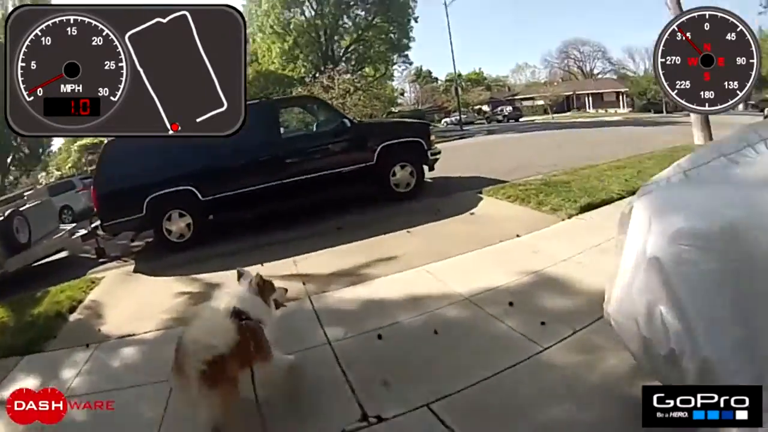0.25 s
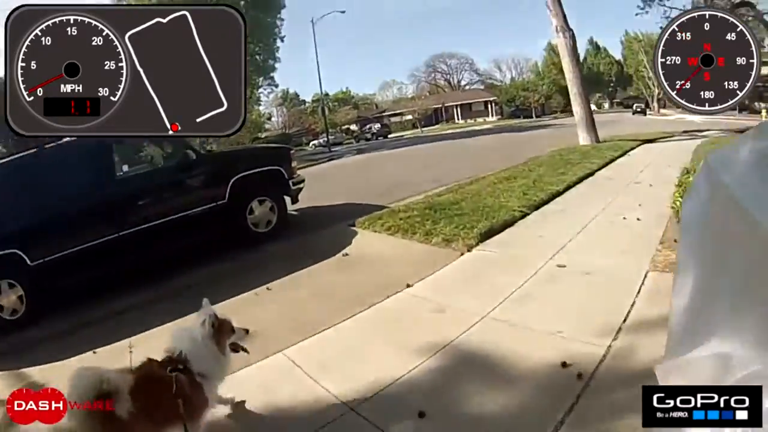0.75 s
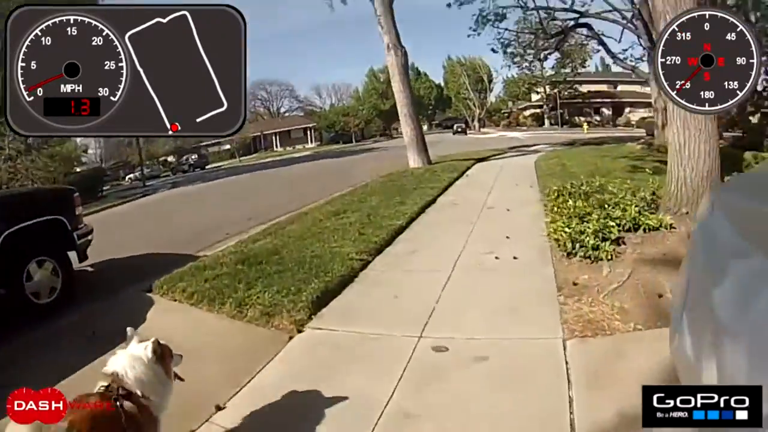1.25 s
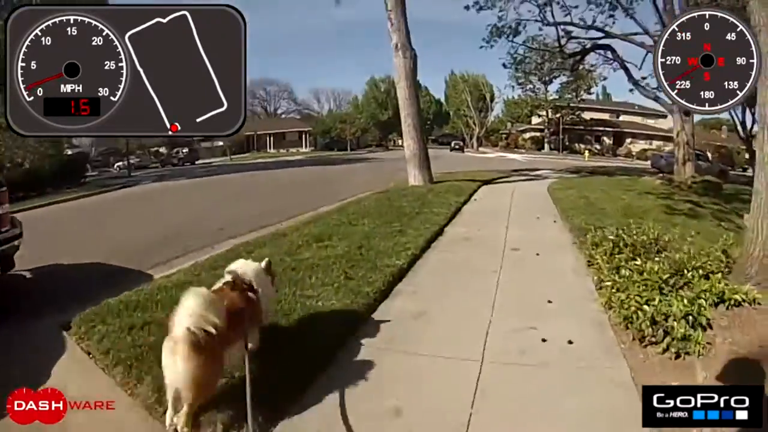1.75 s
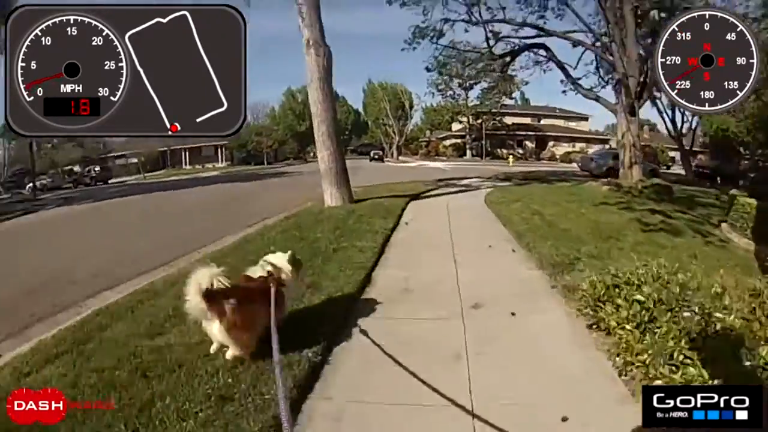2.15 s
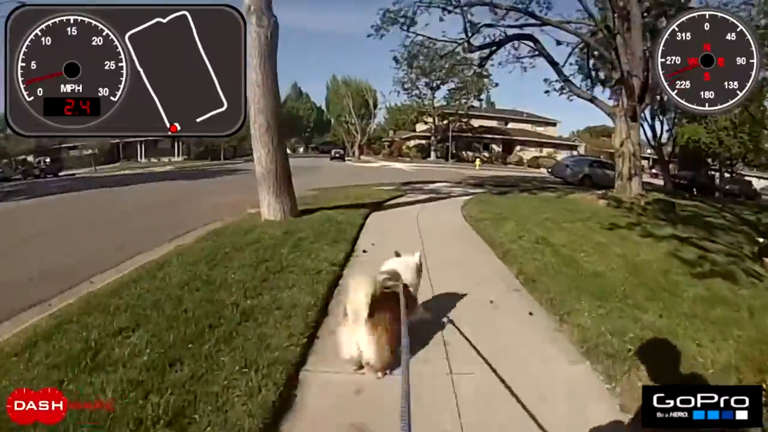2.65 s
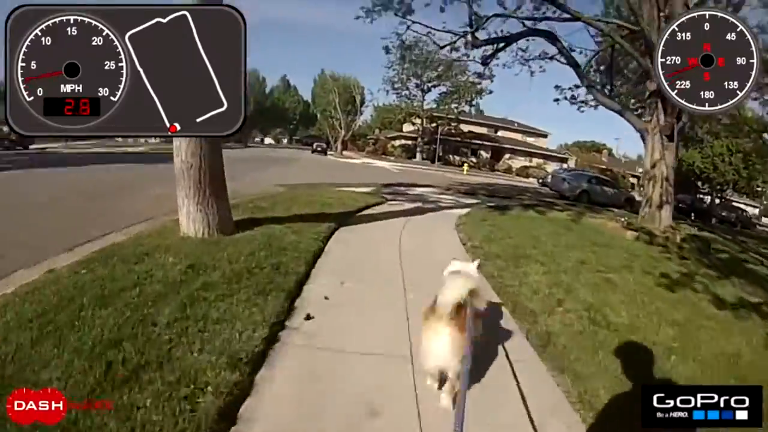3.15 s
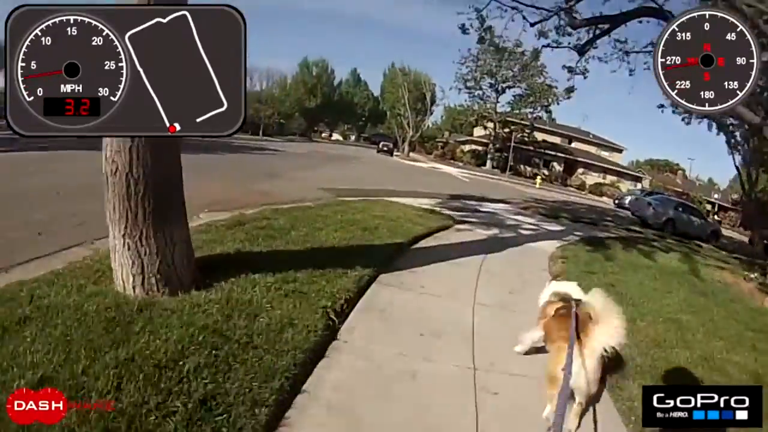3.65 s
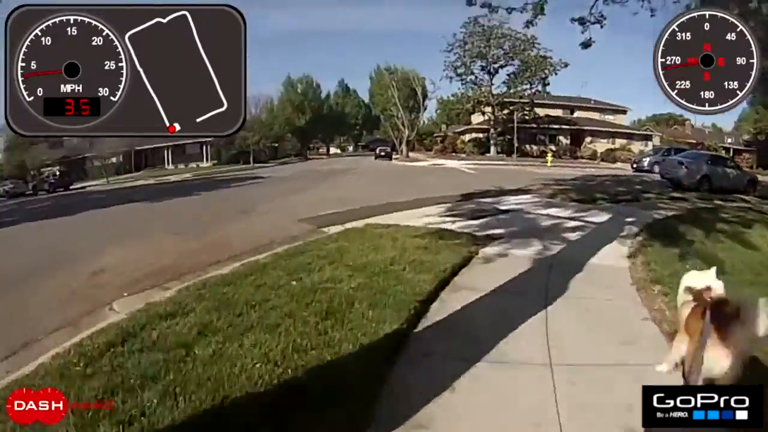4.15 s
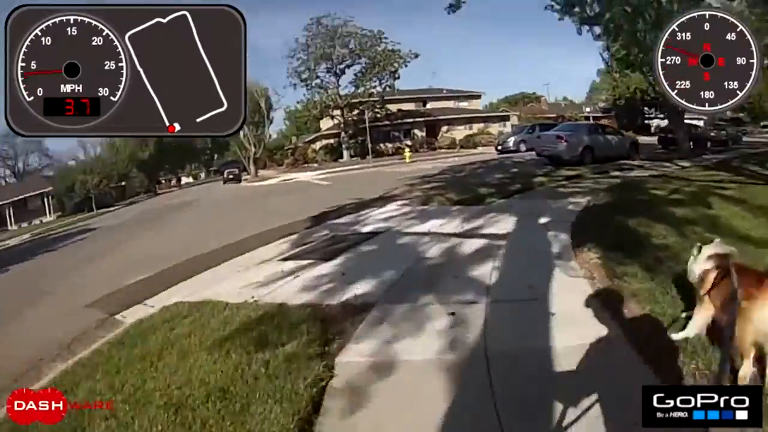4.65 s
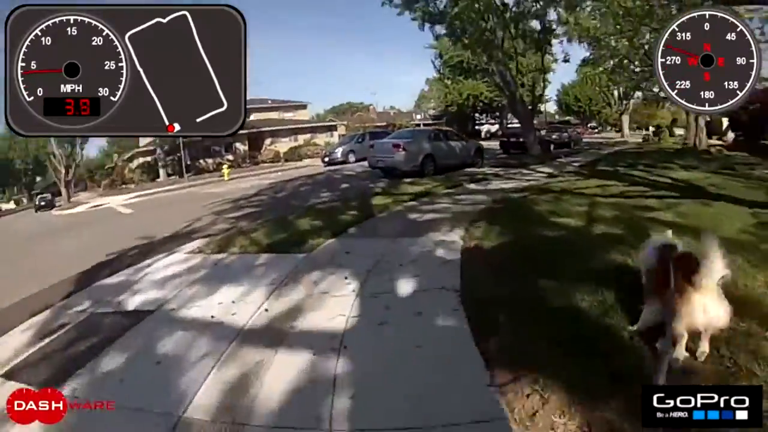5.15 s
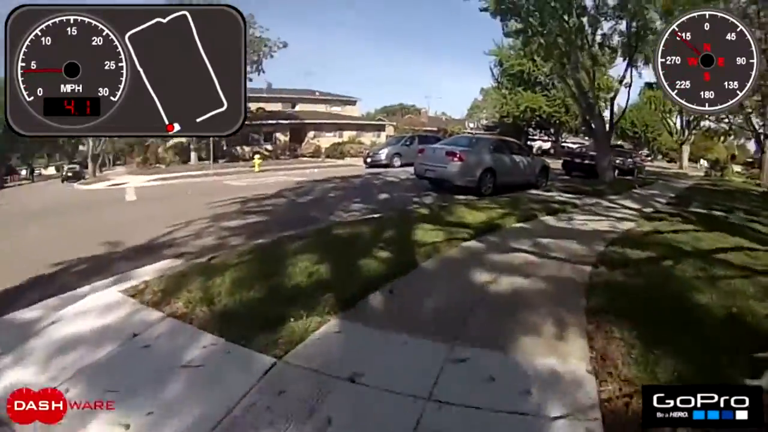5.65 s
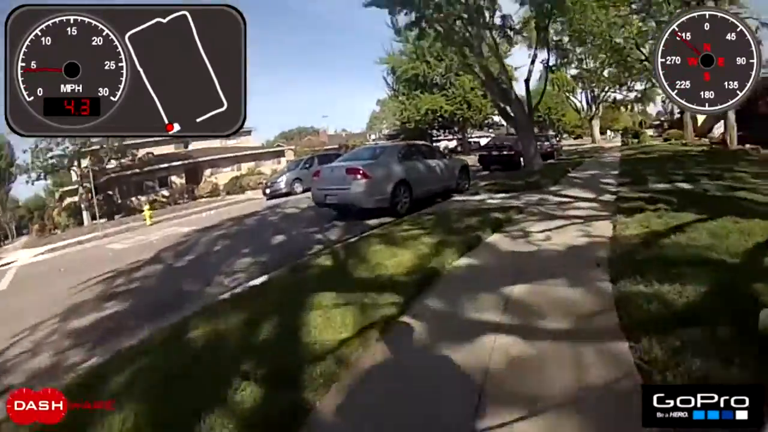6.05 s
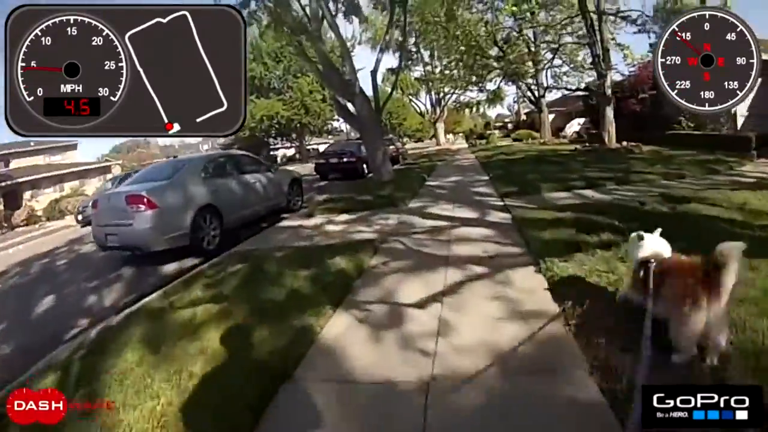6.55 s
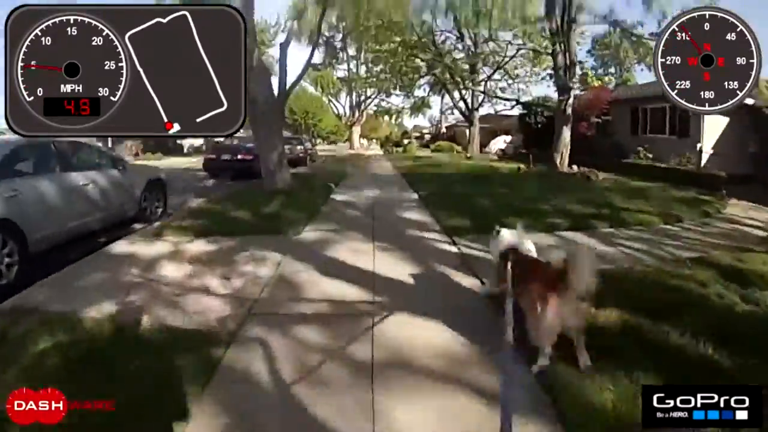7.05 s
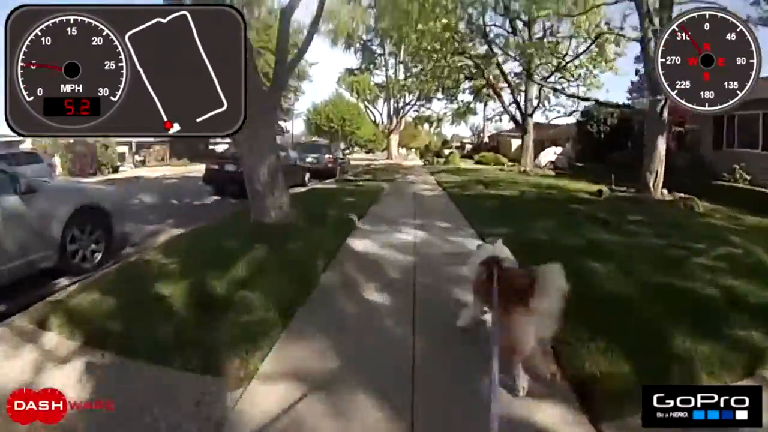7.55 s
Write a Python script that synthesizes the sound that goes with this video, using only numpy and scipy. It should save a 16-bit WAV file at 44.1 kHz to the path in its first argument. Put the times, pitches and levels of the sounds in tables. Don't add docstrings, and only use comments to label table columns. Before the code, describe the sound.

Small hard wheels rumble over a concrete sidewalk, thumping at slab joints, with dull plastic knocks, dry ticks and grit snaps close to the microphone.

```python
import sys
import numpy as np
from scipy import signal
from scipy.fft import rfft, irfft, next_fast_len
from scipy.io import wavfile
from scipy.ndimage import uniform_filter1d, map_coordinates

SR = 44100
rng = np.random.default_rng(int(sys.argv[2]) if len(sys.argv) > 2 else 0)


def undo_db(level):
    steps = np.asarray(level, float) / 20
    return 10 ** steps


def waveform_to_disk(signal):
    frames = np.transpose(np.atleast_2d(signal))
    scaled = np.clip(frames, -1, 1) * 32767
    samples = np.round(scaled).astype(np.int16)
    wavfile.write(sys.argv[1], SR, samples)


N = 343980

# centre_hz, width_hz, level_db
MOUNT_MODES = [(65.1, 20.9, 3.5), (82.6, 35.2, -0.5)]
# centre_hz, width_hz, level_db
EDGE_MODES = [(527, 200, 11), (900, 380, 2.5)]
# centre_hz, width_hz, level_db
HOUSING_MODES = [(1150, 300, 7), (1330, 311, 8), (1500, 500, -2.5), (2167, 130, -10.5), (2210, 480, -11.5)]
# centre_hz, width_hz, level_db
SHELL_MODES = [(1670, 370, 7), (2480, 400, -3)]
# start_s, tick_peak_db, thump_db, knock_db, sharp_edge_db
SLAB_JOINTS = [(0.8377, -29.5, -6.5, -52, -25.5), (1.0494, -25.5, -5, -34, -11.5),
               (1.454, -28.5, -8, -16.5, -17.5), (1.6799, -29.5, -7.5, -12.5, -29),
               (1.9102, -36.5, -21.5, -16, -26), (1.9934, -33.5, -10, -19, -24.5),
               (2.0648, -32.5, -13, -29, -28), (3.1837, -32, -10.5, -39.5, -23.5),
               (4.171, -26, -9.5, -28, -29.5), (4.358, -38, -11.5, -30, -26),
               (4.8778, -32, -10, -44.5, -32), (5.1131, -31, -9.5, -35, -24.5),
               (5.2739, -29, -9.5, -25, -30), (5.451, -33.5, -11, -27.5, -21),
               (5.5015, -21.5, -6, -26, -23), (5.675, -37, -9, -25.5, -18.5),
               (5.8233, -17.5, -11, -21.5, -19), (5.9859, -26, -8, -16.5, -12.5),
               (6.9561, -29, -10.5, -22.5, -16.5), (7.0978, -32.5, -14, -25.5, -20),
               (7.1254, -23.5, -14.5, -21.5, -19), (7.3391, -36, -10.5, -43, -36),
               (7.5312, -27, -14, -29, -23)]
# start_s, tick_peak_db, thump_db, knock_db, sharp_edge_db
FINE_CRACKS = [(0.5189, -47, -12, -27, -30.5), (1.0627, -34, -26, -41, -33), (1.615, -56, -22, -25, -36),
               (1.6279, -58, -19.5, -24.5, -38), (2.303, -39, -10.5, -31, -38.5),
               (2.376, -44.5, -20, -37.5, -53.5), (2.6536, -34, -10.5, -31.5, -41),
               (2.9166, -36, -15, -42, -38.5), (3.1974, -36, -28.5, -57, -33), (4.1831, -35, -22, -53, -27),
               (4.403, -50.5, -19.5, -42, -42), (4.636, -33, -7.5, -42.5, -30.5),
               (4.6499, -40, -18, -51, -34), (4.8186, -48.5, -14.5, -28.5, -41),
               (6.0244, -43.5, -18.5, -37, -29.5), (6.1471, -40, -16, -49.5, -35),
               (6.193, -44, -19, -29.5, -27.5), (6.794, -34, -29, -37, -19), (6.9676, -39, -20, -48, -25),
               (7.136, -35.5, -21, -45, -26.5)]
# start_s, thump_peak_db, sharp_edge_db
STONES = [(0.22, -14, -44), (0.287, -9.5, -45), (0.456, -18, -30.5), (0.673, -7.5, -42), (1.19, -15, -41),
          (1.233, -13.5, -40), (2.608, -5, -39), (2.869, -1.5, -46), (3.083, -17, -28.5), (3.119, -6, -38),
          (3.39, -6, -38), (3.454, -10, -36), (3.559, -12, -35), (3.648, -7, -55), (3.695, -8.5, -39),
          (3.937, -9, -40), (4.091, -6, -41), (4.28, -9, -25.5), (4.579, -5.5, -50), (4.802, -6, -32),
          (4.968, -8, -36), (5.042, -7.5, -41), (5.789, -6.5, -37), (6.293, -3.5, -22.5),
          (6.774, -5.5, -26), (6.901, -8.5, -27), (7.536, -9.5, -26), (7.631, -16, -29),
          (7.682, -13.5, -30), (7.695, -14, -26.5)]
# start_s, peak_db, upper_modes_db
LONE_KNOCKS = [(0.218, -21, -29.5), (0.292, -27, -43), (0.339, -28, -28.5), (0.6781, -30, -52),
               (1.1891, -26.5, -53), (1.2056, -19.5, -38), (1.2288, -22.5, -46.5), (1.954, -15.5, -22.5),
               (1.9985, -12.5, -21.5), (2.474, -24.5, -43.5), (2.516, -28.5, -37), (2.617, -24, -29),
               (3.076, -21, -43), (3.091, -12.5, -41), (3.159, -36, -49), (3.5448, -25, -33),
               (3.557, -16.5, -33), (4.1367, -28, -51), (4.2843, -27.5, -55), (4.5981, -23.5, -51),
               (5.66, -24, -52), (6.2747, -21, -54), (6.3296, -23, -35), (6.429, -25, -49),
               (6.487, -44, -31), (6.794, -26, -42), (7.0107, -34, -37.5), (7.175, -25, -33),
               (7.2529, -23, -34), (7.6227, -44, -40)]
# start_s, peak_db, pitch_hz
DECK_THUDS = [(0.1489, -26.5, 288), (0.1803, -23.5, 280), (0.2217, -18, 280), (0.6345, -17.5, 273),
              (1.3848, -15, 267), (1.872, -18, 258), (1.915, -10, 300), (1.9553, -13, 288),
              (1.9938, -5, 256), (2.2278, -19, 270), (2.4768, -32, 270), (2.6334, -17.5, 270),
              (2.7974, -31, 300), (3.0884, -16, 280), (3.133, -18, 260), (3.6038, -16, 250),
              (3.7043, -18, 244), (3.9063, -27, 260), (4.014, -28, 260), (4.0772, -19.5, 250),
              (4.1372, -17.5, 250), (4.1826, -22, 264), (4.4873, -20, 260), (5.0231, -25, 259),
              (5.5983, -26, 248), (5.7177, -23, 270), (5.9234, -15.5, 250), (6.0397, -16, 280),
              (6.3309, -20, 290), (6.5758, -19.5, 300), (6.6679, -23, 258), (6.736, -30, 260),
              (6.868, -21.5, 290), (7.1218, -12.5, 250), (7.6053, -19.5, 277), (7.6975, -15, 250)]
SHELL_FROM_HZ = 3000


def unit(x):
    return x / np.sqrt(np.mean(x ** 2) + 1e-20)


def steadied(x, span):
    power = np.abs(uniform_filter1d(x ** 2, int(span * SR)))
    return unit(x / np.sqrt(power + 0.41 * np.mean(x ** 2)))


def wobble(rate):
    knots = rng.standard_normal(int(N * rate / SR) + 4)
    return map_coordinates(knots, [np.arange(N) * rate / SR])


def filtered(x, response):
    m = next_fast_len(N + SR // 2)
    return irfft(rfft(x, m) * response(np.fft.rfftfreq(m, 1 / SR)), m)[:N]


def body(modes, low_hz, top_hz, order=2):
    def response(f):
        modal = 0
        for k, (centre, width, db) in enumerate(modes):
            resonance = 1j * f * width / (centre ** 2 - f * f + 1j * f * width)
            modal = modal + (-1) ** k * undo_db(db) * resonance
        stiffness = (1j * f / (low_hz + 1j * f)) ** 2
        damping = (1 + 1j * f / top_hz - (f / top_hz) ** 2) ** order
        whole = modal * stiffness / damping
        return whole / np.abs(irfft(whole)).max()
    return response


def bright(f):
    # frequency_hz, spectrum_db
    colour = [(2200, -50), (2800, 2), (3500, -0.5), (5000, -1), (7000, -8.5), (10000, -16), (11200, -16.5),
              (15500, -36)]
    hz, db = np.transpose(colour)
    return undo_db(np.interp(np.log(f + 1), np.log(hz), db))


def grit(rate, scatter_db):
    spread = np.minimum(rng.exponential(size=N), 4.5)
    size = undo_db(scatter_db * spread) * rng.standard_normal(N)
    return size * (rng.random(N) < rate / SR)


def blows(times, level_db):
    x = np.zeros(N)
    way = np.where(rng.random(len(times)) < 0.06, -1, 1)
    np.add.at(x, np.clip((times * SR).astype(int), 0, N - 1), way * undo_db(level_db))
    return x


def bursts(times, level_db, lengths):
    x, t = np.zeros(N + SR), np.arange(SR // 20) / SR - 0.008
    sub_hits = rng.standard_normal((len(times), len(t) // 63)).repeat(63, axis=1)
    chatter = rng.standard_normal((len(times), len(t))) * undo_db(5.2 * sub_hits)
    for s, db, length, row in zip(times, level_db, lengths, chatter):
        hit = row * np.where(t > 0.001, undo_db(-20 * t / length), undo_db(-9 + 20 * t / 0.0055))
        hit *= np.sqrt(length * SR) / np.linalg.norm(hit)
        x[max(int((s + t[0]) * SR), 0):][:len(t)] += undo_db(db) * hit
    return x[:N]


def notes(rows, rise, gain_db):
    x, t = np.zeros(N + SR), np.arange(SR // 20) / SR
    swell = t / rise * np.exp(1 - t / rise)
    for s, db, hz in rows:
        x[int((s - rise) * SR):][:len(t)] += undo_db(db + gain_db) * swell * np.sin(2 * np.pi * hz * t)
    return x[:N]


def tick_pitches(count):
    return 3800 * np.exp(0.13 * rng.standard_normal(count))


def joint_parts():
    s, tick_db, thump_db, knock_db, edge_db = np.transpose(SLAB_JOINTS + FINE_CRACKS)
    knock_db = knock_db + 4.5
    upper_db = -5 + 0.57 * tick_db + 0.43 * knock_db
    thumps = (s - 0.00524, thump_db + 7.5, edge_db + 7.5)
    return thumps, (s - 0.001, knock_db, upper_db), (s, tick_db)


def open_air():
    return undo_db(-84.5 + 2 * wobble(8)) * unit(filtered(rng.standard_normal(N), bright))


def tags():
    # start_s, length_s, level_db
    jingles = [(0.336, 0.011, -52), (0.455, 0.013, -44.5), (0.679, 0.025, -61), (1.675, 0.026, -51.5),
               (3.463, .04, -60), (3.545, 0.025, -52), (5.882, .01, -64), (6.335, 0.012, -61.5),
               (6.364, 0.011, -53), (7.095, 0.033, -55.5), (7.126, 0.059, -61), (7.164, 0.1, -60)]
    # centre_hz, width_hz, level_db
    metal_modes = [(4000, 180, 9), (5000, 230, 1), (6100, 250, -2.5), (7540, 250, -4), (8780, 200, -6),
                   (11400, 290, -5), (11800, 400, -9.5)]
    shake = np.zeros(N)
    for s, length, db in jingles:
        shake[int(s * SR):int((s + length) * SR)] = undo_db(db)
    contacts = grit(rate=1200, scatter_db=4) * undo_db(4 * wobble(70))
    ringing = unit(filtered(contacts, body(metal_modes, low_hz=2530, top_hz=13000)))
    return uniform_filter1d(shake, int(0.006 * SR)) * ringing


def swing_under_way():
    # start_db, pitch_hz, t60_s
    first_swing = (-1.5, 72, 0.1)
    t, (start_db, hz, t60) = np.arange(N) / SR, first_swing
    return undo_db(start_db - 60 * t / t60) * np.cos(2 * np.pi * hz * t + 0.85)


def specks():
    # start_s, peak_db
    small_specks = [(0.2348, -45.5), (0.3487, -51), (0.4668, -48.5), (0.8473, -45), (1.2505, -49),
                    (1.63, -48), (1.6359, -47.5), (1.6848, -39), (1.696, -45), (1.919, -44), (1.956, -41),
                    (1.9595, -48.0), (2.0036, -38), (2.07, -43.5), (2.0947, -45), (2.306, -41),
                    (2.4903, -50), (2.552, -48.5), (2.5591, -45), (2.6594, -48), (2.6675, -45.5),
                    (2.8544, -48), (3.47, -51), (3.552, -49), (3.5598, -43), (3.5673, -48.0), (3.7002, -51),
                    (3.7123, -50), (3.723, -47), (3.7959, -49.5), (3.807, -45.5), (3.8298, -46),
                    (3.8375, -51.5),
                    (4.5835, -52), (4.589, -46.5), (5.2885, -46.5), (5.6845, -47), (5.8011, -44.5),
                    (5.8087, -48), (5.9945, -44.5), (6.0412, -50), (6.154, -49.5), (6.3284, -45),
                    (6.4874, -52), (6.571, -48), (6.5787, -48), (6.5828, -45.5), (6.6699, -45.5),
                    (6.676, -46.5), (6.7605, -45), (6.7782, -45.5), (6.8526, -47), (6.9134, -45),
                    (6.9212, -45.5), (6.9473, -50.5), (6.9558, -21.5), (7.1035, -44), (7.1361, -35.5),
                    (7.1448, -42.5), (7.1669, -45), (7.1776, -39.0), (7.1991, -46), (7.2382, -48),
                    (7.247, -51.5), (7.259, -43), (7.4222, -48), (7.535, -39), (7.5465, -39), (7.5617, -46),
                    (7.6241, -47.5), (7.6316, -46), (7.688, -42)]
    s, db = np.transpose(small_specks)
    pitched = notes(zip(s, db, tick_pitches(len(s))), rise=0.00036, gain_db=-3)
    click = np.zeros(N)
    click[(s * SR).astype(int)] = undo_db(db)
    shell = filtered(click, body(SHELL_MODES, low_hz=1400, top_hz=2700, order=3))
    return filtered(pitched + undo_db(17) * click, bright) + undo_db(4.5) * shell


def scrapes():
    # start_s, length_s, shell_db, bright_grit_db
    patches = [(0.447, 0.086, -37.5, -66), (0.657, 0.046, -53.5, -59.5), (1.442, 0.027, -34, -53),
               (1.552, 0.026, -43.5, -64.5), (1.605, 0.073, -46, -61), (1.895, 0.11, -43, -76),
               (2.354, 0.057, -58, -58.5), (2.51, 0.11, -48, -65.5), (3.932, 0.032, -49, -57.5),
               (4.585, 0.086, -53, -67), (4.793, 0.11, -55, -67), (5.66, 0.055, -56, -70),
               (6.029, 0.052, -46, -64), (6.25, 0.16, -43, -82.5), (6.922, 0.049, -38.5, -67.5),
               (7.107, 0.035, -29.5, -59), (7.173, 0.085, -46.5, -59.5), (7.531, 0.02, -38, -54.5)]
    shake = np.zeros((2, N))
    for s, length, shell_db, bright_db in patches:
        swell = np.hanning(int(1.44 * length * SR)) ** 0.74
        levels = undo_db([[shell_db - 0.5], [bright_db - 0.5]])
        shake[:, int((s - length / 4) * SR):][:, :len(swell)] += levels * swell
    shake = uniform_filter1d(shake, int(0.011 * SR), axis=1) * undo_db(4 * wobble(80))
    shell = body(SHELL_MODES, low_hz=1200, top_hz=2600, order=4)
    rasp = steadied(filtered(grit(rate=6700, scatter_db=4.5), shell), span=0.086)
    crackle = steadied(filtered(grit(rate=720, scatter_db=2), bright), span=0.034)
    return shake[0] * rasp + shake[1] * crackle


def ticks():
    # start_s, peak_db, pitch_hz
    lone_ticks = [(0.0305, -35, 4900), (0.225, -35.5, 3500), (0.3409, -32, 4900), (0.4054, -44, 4880),
                  (0.4593, -31.5, 4230), (0.6516, -47, 3470), (0.666, -42, 3700), (1.2456, -39.5, 3530),
                  (1.8695, -41, 4100), (1.951, -48, 3930), (2.5312, -41.5, 3870), (2.5991, -44, 3440),
                  (2.876, -34, 4140), (3.1278, -33.5, 3837), (3.397, -41.5, 3450), (3.4618, -35, 3915),
                  (3.544, -39.5, 4360), (3.6571, -39.5, 3364), (3.705, -34.5, 3400), (3.9436, -33, 3520),
                  (4.806, -51.5, 3506), (5.0502, -42, 3520), (6.3007, -34, 3276), (6.3344, -31, 4280),
                  (6.3651, -33.5, 4170), (6.4173, -41.5, 3320), (6.7862, -34, 3570), (6.9419, -41.5, 3780),
                  (7.6797, -37.5, 4110), (7.6968, -31, 4076)]
    joint_s, joint_db = joint_parts()[2]
    joint_ticks = [joint_s, joint_db, tick_pitches(len(joint_s))]
    s, db, pitch = np.hstack([joint_ticks, np.transpose(lone_ticks)])
    length = 0.0029 + 0.0012 * rng.random(len(s))
    x, t = undo_db(-5) * bursts(s, db, length), np.arange(SR // 30) / SR
    ring_db = db - 8 * (np.arange(len(s)) < len(SLAB_JOINTS))
    for at, level_db, hz in zip(s, ring_db, pitch):
        decay = undo_db(level_db - 1 - 60 * t / 0.0046)
        ring = decay * np.sin(2 * np.pi * hz * t) * (1 - np.exp(-t / 0.00037))
        x[int(at * SR):][:len(t)] += ring[:N - int(at * SR)]
    x[(s * SR).astype(int) + 20] += undo_db(db + 6.5)
    return filtered(x, bright)


def knocks():
    s, db, upper_db = np.hstack([joint_parts()[1], np.transpose(LONE_KNOCKS)])
    length = 0.0065 + 0.0024 * rng.random(len(s))
    low = filtered(bursts(s, db, length), body(HOUSING_MODES[:2], low_hz=690, top_hz=2020))
    high = filtered(bursts(s, upper_db, length), body(SHELL_MODES, low_hz=910, top_hz=3170))
    return undo_db(-25.5) * low + undo_db(-16.5) * high


def rings():
    # start_s, peak_db, pitch_hz
    deck_rings = [(0.834, -17.5, 407), (1.679, -16.5, 400), (1.917, -17, 400), (2.078, -26, 524),
                  (5.275, -12, 342), (5.276, -24.5, 637), (5.822, -15, 392), (7.531, -15.5, 400)]
    # start_s, peak_db, pitch_hz
    shell_taps = [(0.2205, -13, 1300), (0.2945, -32, 1250), (0.4057, -29, 1225), (0.5219, -29, 1200),
                  (0.583, -23, 1320), (0.8361, -26, 1200), (1.6499, -24, 1205), (1.6932, -28, 1360),
                  (1.9361, -23, 1170), (2.4838, -30, 1220), (2.5297, -27.0, 1495), (2.5788, -25.5, 1190),
                  (2.5888, -32, 1520), (2.6469, -24, 1150), (2.8155, -31, 1200), (3.1197, -30, 1280),
                  (3.182, -25, 1220), (3.601, -27, 1360), (3.6899, -26, 1203), (4.1719, -22.5, 1445),
                  (4.4977, -26, 1190), (4.5859, -30.5, 1260), (4.5992, -18.5, 1220), (4.6136, -24.5, 1200),
                  (4.8043, -30, 1350), (4.8319, -30.5, 1302), (4.8666, -22.5, 1223), (5.8238, -15.5, 2210),
                  (5.9533, -26.5, 1334), (6.3008, -24, 1270), (6.3669, -23.5, 1270), (6.4727, -28, 1370),
                  (6.6107, -26, 1235), (6.7473, -26, 1280), (6.8509, -31, 1210), (6.9545, -13, 990),
                  (7.1147, -21.5, 1150), (7.2557, -28, 1350), (7.3378, -25, 1300), (7.5422, -32, 1510),
                  (7.6231, -32, 1540), (7.6367, -34, 1324), (7.699, -29.5, 1430)]
    # start_s, peak_db, pitch_hz
    joint_snaps = [(0.838, -25.5, 1440), (0.84, -36, 7400), (1.0505, -35.5, 4950), (1.4535, -19.5, 1520),
                   (1.6795, -13, 956), (1.454, -21, 2320), (5.2755, -22.5, 1750), (5.5035, -12, 1820),
                   (5.988, -19.5, 2250), (7.124, -16.5, 2400), (7.1245, -12, 1546)]
    deck = notes(DECK_THUDS + deck_rings, rise=0.0026, gain_db=0)
    taps = notes(shell_taps, rise=0.0013, gain_db=-2.5)
    return deck + taps + notes(joint_snaps, rise=0.00065, gain_db=4)


def shudder():
    s, _, edge_db = joint_parts()[0]
    chatter = bursts(s + 0.012, edge_db, np.full(len(s), 0.03))
    deck_and_shell = body(EDGE_MODES + HOUSING_MODES[:3], low_hz=350, top_hz=2400, order=4)
    return undo_db(-49) * filtered(chatter, deck_and_shell)


def jolts():
    # centre_hz, width_hz, level_db
    kick_modes = [(94, 68.4, 5), (201, 118, -3)]
    stones = np.transpose(STONES) + [[0.002], [0], [8]]
    s, db, edge_db = np.hstack([joint_parts()[0], stones])
    kick = blows(s + 0.00272, db)
    thump = filtered(kick, body(kick_modes, low_hz=36, top_hz=400, order=3))
    swing = filtered(kick, body(MOUNT_MODES, low_hz=34.2, top_hz=247))
    edge = filtered(blows(s + 0.005334, edge_db), body(EDGE_MODES, low_hz=252, top_hz=1070))
    return undo_db(1.5) * thump + undo_db(-12) * swing + undo_db(-3.5) * edge


def load():
    # start_s, roughness_db, mount_sway_db, frame_flex_db
    road = [(0, -8, 6.5, 4.5), (.3, -2, -6.5, 4.5), (.6, -0.5, 2.5, 2.5), (1.2, -3.5, -0.5, -1.5),
            (1.9, -2.5, -5, -1.5), (2.5, -3, 1, 0.5), (3.1, 0, -2, 0), (3.7, -1, 1.5, -5.5),
            (4.099, -3.5, -1, 1), (4.701, 5.5, -1, 0.5), (5.2, 7, 2, -2.5), (5.699, 2, -10, 8),
            (6.201, 0, -3, -0.5), (6.6, 0, 0, -1), (6.901, 1.5, 0, 2), (7.3, 1.5, -5, 1),
            (7.8, 1.5, 1.5, -3)]
    # start_s, load_lost_db, settling_s, sway_lost_db
    lifts = [(0, -2.5, 0.18, 18.5), (.22, 2, 0.14, -3), (0.845, 18.5, 0.17, 24), (1.059, 24.5, 0.047, 28),
             (1.26, 9, 0.13, 14), (1.458, 14, 0.07, 20), (1.716, 13, 0.15, 1), (2.086, 9.5, 0.12, 13),
             (2.643, 2, 0.22, 6), (2.908, 15, 0.078, 16.5), (3.18, 13.5, 0.23, 8.5), (3.443, 3.5, 0.19, 10),
             (3.942, 7.5, 0.087, 8), (4.171, 8, 0.12, 11.5), (4.319, 9, 0.32, 6.5), (4.621, 12.5, 0.14, 11),
             (4.85, 13.5, 0.22, 12.5), (5.12, 18, 0.11, 13), (5.278, 14, 0.078, 14), (5.4, 9.5, 0.3, 14),
             (5.519, 10, 0.07, 5.5), (5.679, 9.5, 0.042, 7.5), (5.825, 6.5, 0.23, 8),
             (6.042, 8.5, 0.096, 1.5), (6.159, 1, 0.22, 4.5), (6.338, 2.5, 0.1, 3), (6.94, 4, 0.13, 11.5),
             (7.201, 3, 1, -1), (7.538, 1.5, 0.13, 4.5), (7.689, 4.5, 0.055, 12.5)]
    t = np.arange(N) / SR
    s, *controls = np.transpose(road)
    rough_db, sway_db, flex_db = [np.interp(t, s, c) for c in controls]
    for at, lost_db, settle, sway_lost_db in lifts:
        low = at + 0.015 + abs(lost_db) / 301.5
        dip = np.interp(t, [at, low, low + settle], [0, 1, 0])
        rough_db = rough_db - lost_db * dip
        sway_db = sway_db - sway_lost_db * dip
    return rough_db, sway_db, flex_db


def shedding():
    x, t, fall_s = np.zeros(N), np.arange(SR // 10) / SR, 0.028
    events = SLAB_JOINTS + FINE_CRACKS + STONES + DECK_THUDS + LONE_KNOCKS
    x[(np.array([row[0] for row in events]) * SR).astype(int)] = 1
    fall = t / fall_s * np.exp(1 - t / fall_s)
    return np.minimum(signal.fftconvolve(x, fall)[int(fall_s * SR):][:N], 1)


def rolling():
    # centre_hz, width_hz, level_db
    frame_modes = [(118, 82.5, 4.5), (188.8, 109.3, 3), (277, 86, -2)]
    load_db, sway_db, flex_db = load()
    held_db = 10 * np.log10(undo_db(2 * load_db) + undo_db(2 * -21))
    swing_db = -13.5 + sway_db
    hum_db = -40 + held_db
    grit_db = -67.5 + 0.79 * load_db
    rumble_db = -20.5 + flex_db + 0.97 * (0.7 * load_db + 0.34 * sway_db)

    rough = 1.5 * np.tanh(wobble(30))
    coarse = grit(rate=300, scatter_db=2)
    fine = grit(rate=750, scatter_db=3.5)
    dust = grit(rate=2000, scatter_db=2.5)
    grains = grit(rate=900, scatter_db=3.5)

    mount = body(MOUNT_MODES, low_hz=31, top_hz=199)
    frame = body(frame_modes, low_hz=56, top_hz=364, order=6)
    edge = body(EDGE_MODES, low_hz=300, top_hz=870, order=4)
    housing = body(HOUSING_MODES, low_hz=860, top_hz=2400, order=6)
    swing = steadied(filtered(coarse, mount), span=0.048)
    rumble = steadied(filtered(coarse + 0.78 * fine, frame), span=0.067)
    scrape = steadied(filtered(fine, edge), span=0.29)
    hum = steadied(filtered(0.74 * fine + 0.66 * dust, housing), span=0.058)
    sparks = steadied(undo_db(3 * wobble(45)) * filtered(grains, bright), span=0.11)
    sparks = sparks * undo_db(9.5 * shedding() - 11.5)
    hiss = 0.5 * unit(filtered(rng.standard_normal(N), bright))

    low = undo_db(swing_db) * swing + undo_db(rumble_db - 4 + 1.9 * rough) * rumble
    between = undo_db((rumble_db + hum_db) / 2 - 19.5 + 2.3 * rough) * scrape
    shell = undo_db(hum_db - 0.64 + 2.92 * rough) * hum
    return low + between + shell + undo_db(grit_db + 1) * (undo_db(5.1 * rough) * sparks + hiss)


def streaky(x):
    hz, _, z = signal.stft(x, SR, nperseg=1024, noverlap=768)
    field = uniform_filter1d(rng.standard_normal(z.shape), size=2, axis=0)
    field = unit(uniform_filter1d(field, size=7, axis=1))
    gain_db = (3.5 * field - 1.33) * ((hz > 150) & (hz < SHELL_FROM_HZ))[:, None]
    return signal.istft(z * undo_db(gain_db), SR, nperseg=1024, noverlap=768)[1][:N]


def patchy(x):
    hz, _, z = signal.stft(x, SR, nperseg=128)
    field = uniform_filter1d(rng.standard_normal(z.shape), size=2, axis=0)
    field = unit(uniform_filter1d(field, size=12, axis=1))
    octaves = np.log2(np.maximum(hz, 4000) / 4000)[:, None]
    tilt = unit(uniform_filter1d(rng.standard_normal(z.shape[1]), size=8)) * octaves
    gain_db = (3 * field + 2.5 * tilt - 0.8) * (hz > SHELL_FROM_HZ)[:, None]
    return signal.istft(z * undo_db(gain_db), SR, nperseg=128)[1][:N]


def housing_notch(f):
    detuning = 910 ** 2 - f * f
    return (detuning + 1j * f * 70) / (detuning + 1j * f * 220)


def scene():
    roll = streaky(filtered(rolling(), housing_notch))
    hits = open_air() + tags() + scrapes() + ticks() + knocks() + jolts()
    direct = swing_under_way() + specks() + rings() + shudder()
    return (patchy(roll + hits) + direct)[None]


def roll_off(x):
    return signal.sosfilt(signal.butter(12, 15800, fs=SR, output="sos"), x)


def record(dry):
    top, hardness = 0.985, 7.5
    mix = dry / (1 + np.abs(dry / top) ** hardness) ** (1 / hardness)
    return roll_off(mix)


dry = scene()
out = record(dry)
waveform_to_disk(out)
```